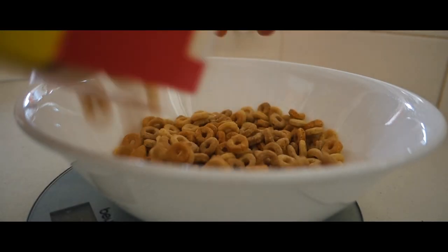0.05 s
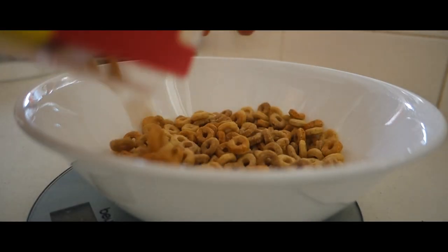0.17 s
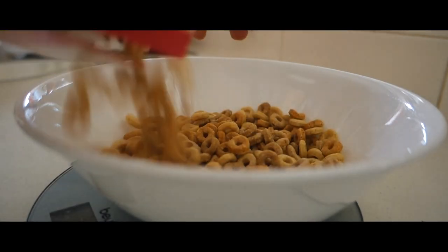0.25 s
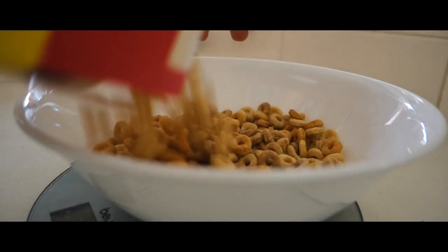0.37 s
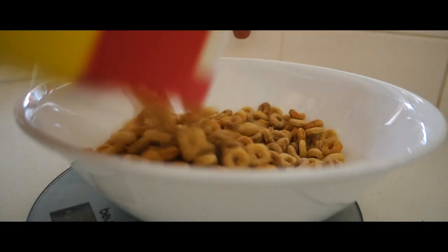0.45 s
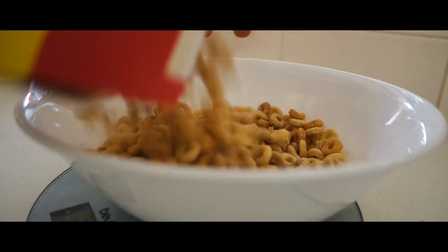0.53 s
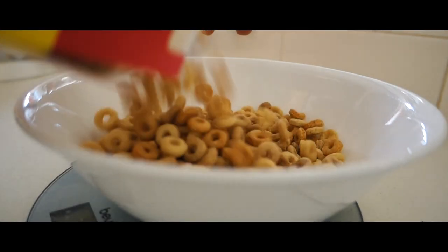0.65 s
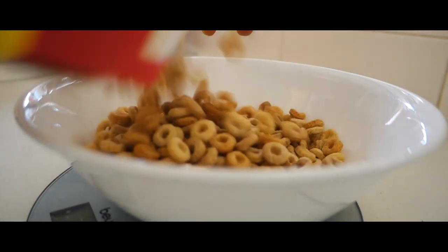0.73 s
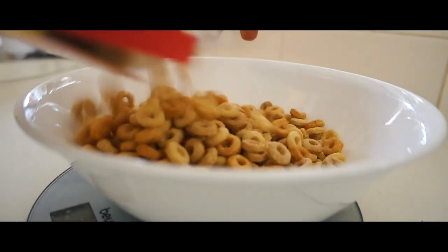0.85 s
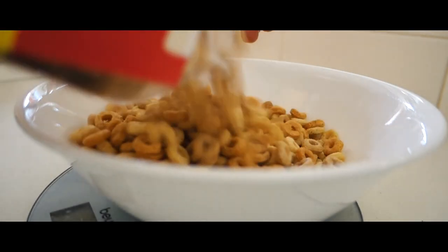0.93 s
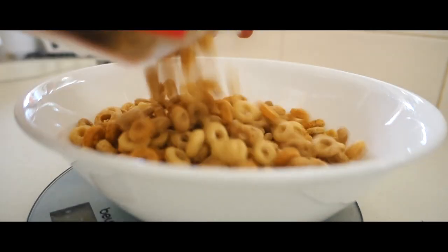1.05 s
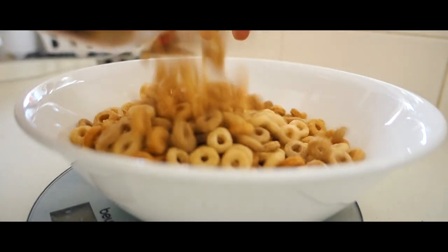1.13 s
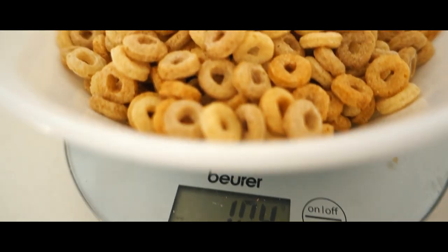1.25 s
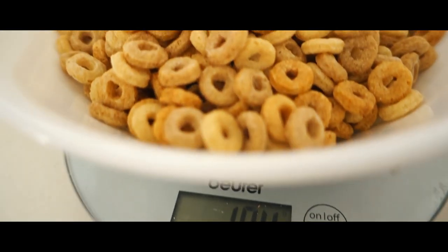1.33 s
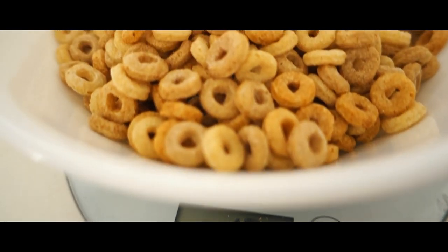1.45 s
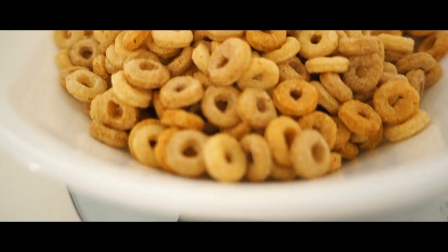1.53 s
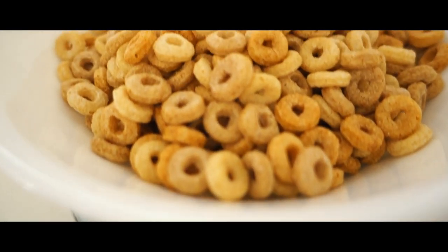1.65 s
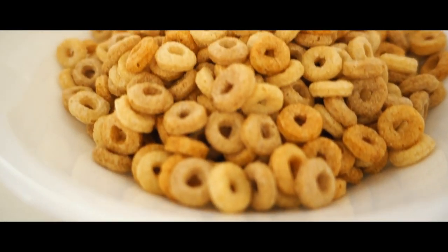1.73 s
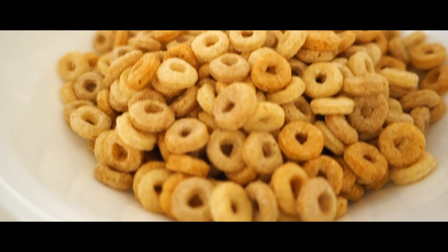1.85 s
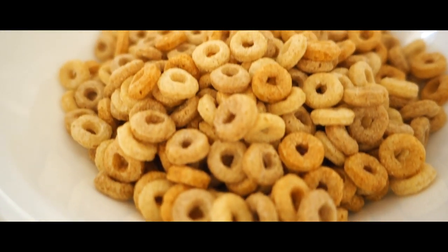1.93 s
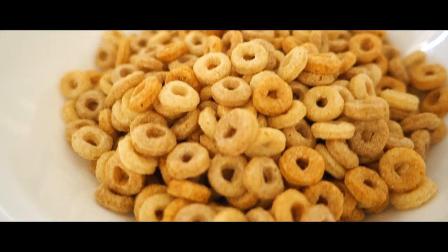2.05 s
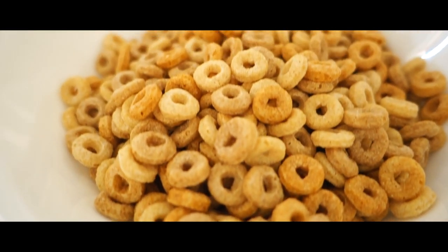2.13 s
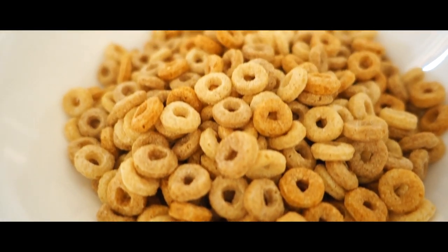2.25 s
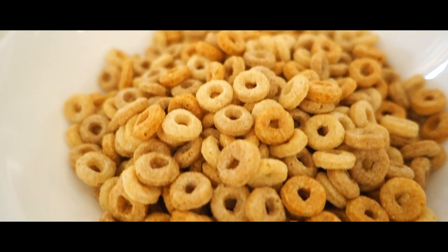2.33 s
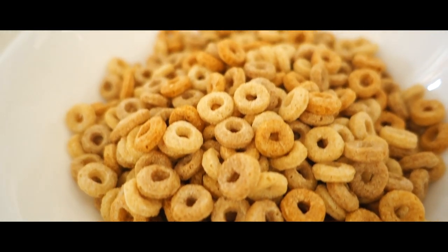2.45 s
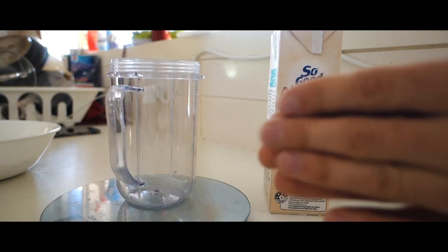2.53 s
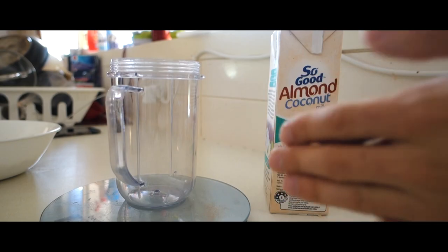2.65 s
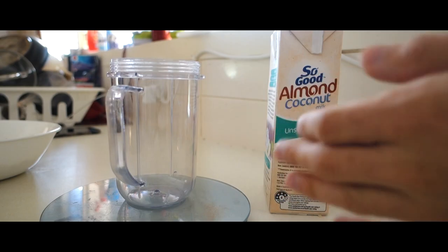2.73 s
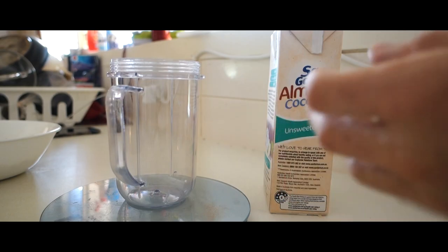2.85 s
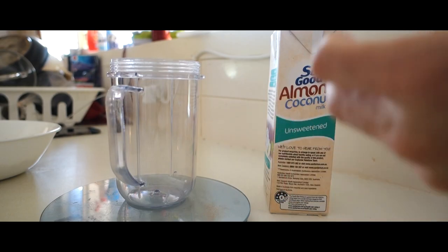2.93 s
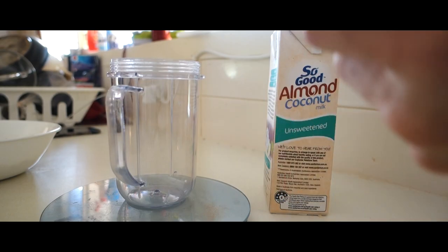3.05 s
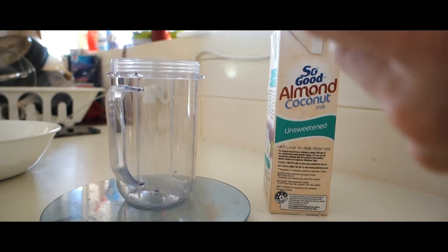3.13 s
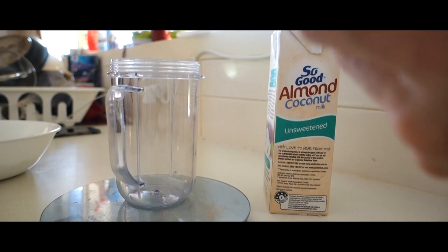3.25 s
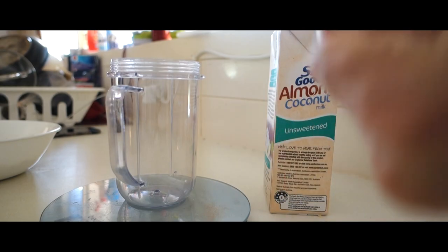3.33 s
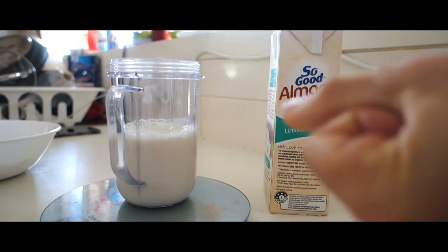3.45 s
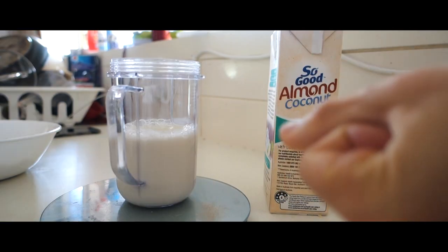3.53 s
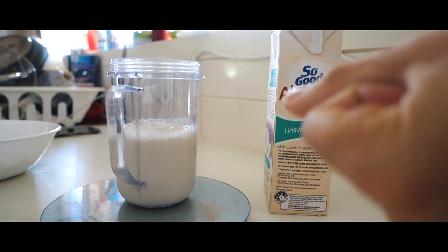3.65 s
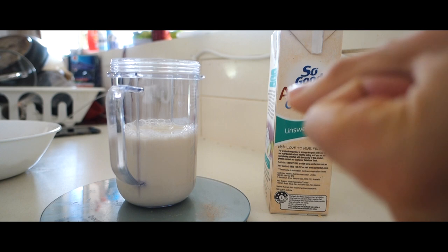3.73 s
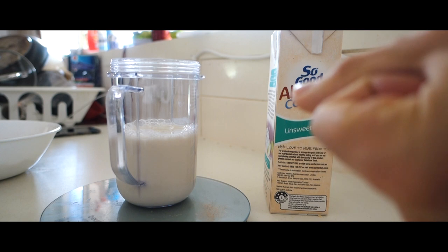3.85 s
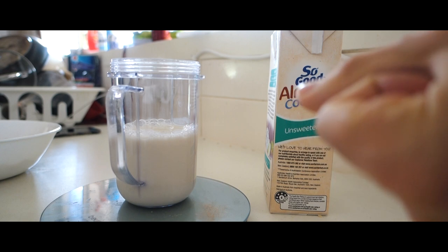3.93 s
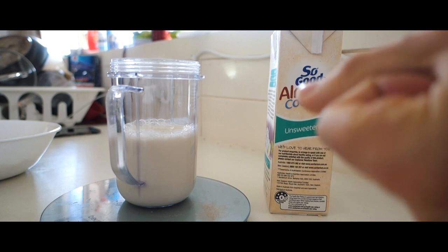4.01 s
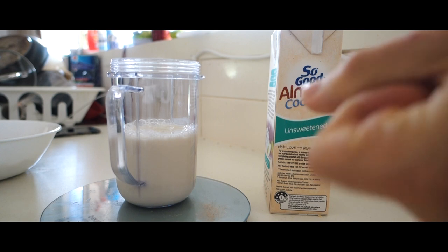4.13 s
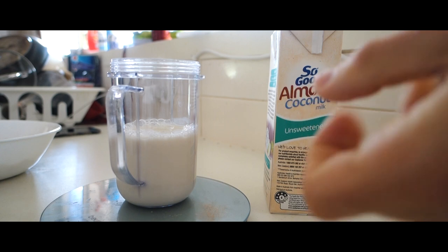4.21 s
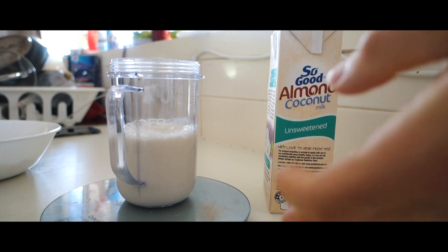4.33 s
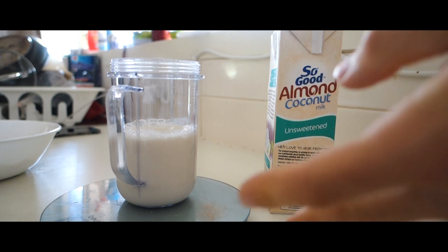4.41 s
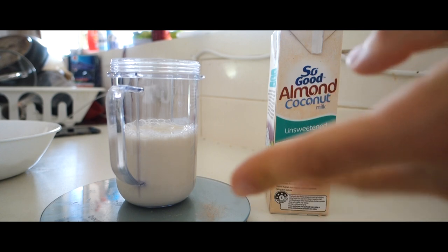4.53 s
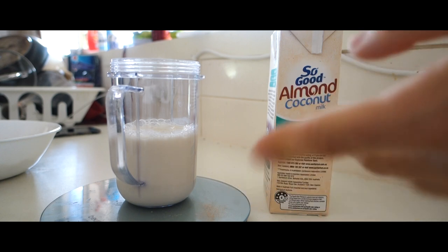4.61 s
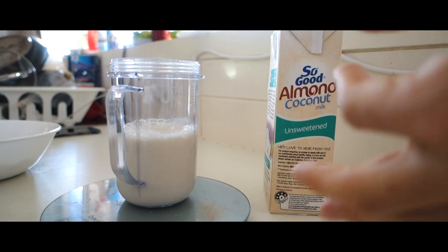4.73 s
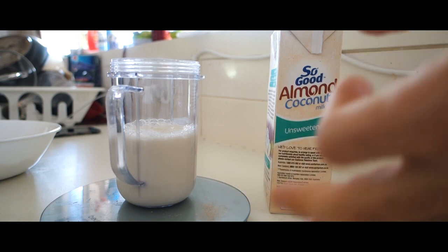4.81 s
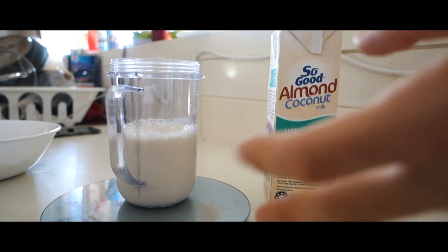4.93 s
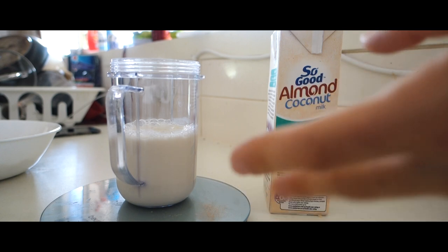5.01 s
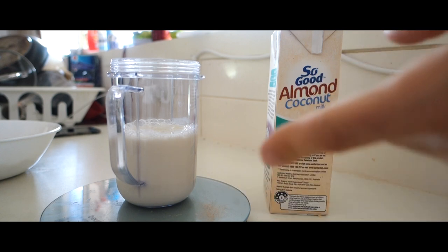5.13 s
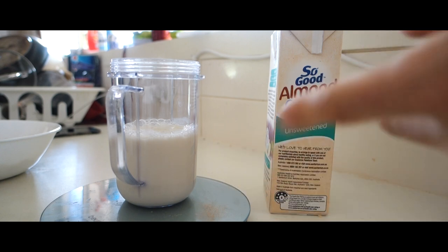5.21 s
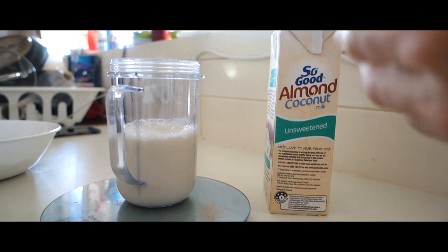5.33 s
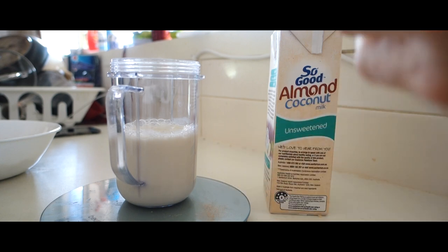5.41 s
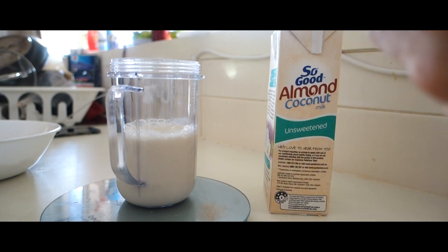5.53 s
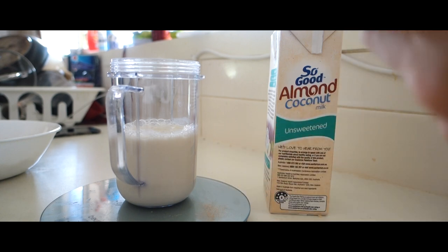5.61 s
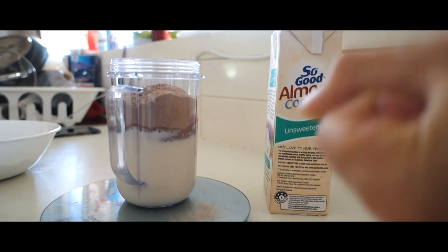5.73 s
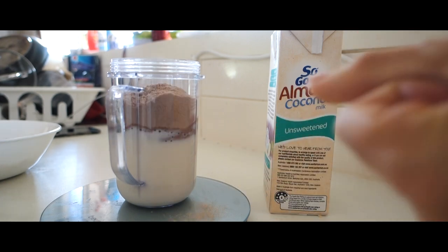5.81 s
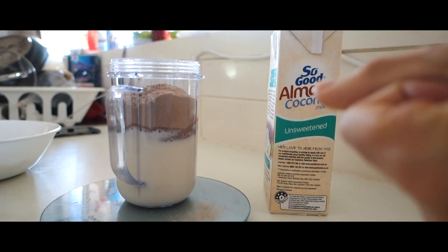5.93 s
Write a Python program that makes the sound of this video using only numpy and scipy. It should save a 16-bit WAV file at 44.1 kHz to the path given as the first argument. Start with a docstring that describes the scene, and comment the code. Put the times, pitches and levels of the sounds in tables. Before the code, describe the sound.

From 0 to 1.24 s, dry cereal hoops pour loudly and close in uneven shakes: hollow cardboard drumming and flaps, dense crisp clicks on the heap, and short high ceramic pings from the bowl. It stops dead. Low, quiet kitchen air remains, with small scratchy scuffs near 1.45 and 2.0 s and faint dull knocks between 1.4 and 2.4 s. At about 2.56 s the room tone switches abruptly, gaining a faint low appliance hum. A hand brushes with fine hiss and a tiny rising squeak at 2.7 s; woody counter knocks grow from 2.6 s into a tight flurry at 3.05-3.2 s, with one hard click. A sharp, bright finger snap cracks at 3.43 s, leaning right, with a hard-walled ring. Near quiet follows, with faint sleeve swishes around 4.6 s and 5.65 s. A second, slightly softer and lower snap comes at 5.77 s, its ring fading out.

```python
"""Cereal hoops are shaken from a cardboard box into a ceramic bowl, then hands scuff, knock and snap.
The pour is random collisions coloured as box and heap, plus decaying bowl modes; it stops dead.
Scuffs are jerky grains, knocks are bursts through counter resonances, the rustle is shaped hiss with a squeak.
Two finger snaps are noise cracks with a palm resonance, a thump and a long, hard-walled kitchen ring.
A low room tone lies underneath; it switches to a second colour with an appliance hum."""
import sys
import numpy as np
from scipy import signal
from scipy.fft import rfft, irfft, next_fast_len
from scipy.io import wavfile

SR = 44100
rng = np.random.default_rng(int(sys.argv[2]) if len(sys.argv) > 2 else 0)


def unload_wav(signal):
    """Save mono or channel-first audio to the path in sys.argv[1] as 16-bit WAV at rate SR, clipped to [-1, 1]."""
    wavfile.write(
        sys.argv[1],
        SR,
        np.round(np.clip(np.atleast_2d(signal).T, -1, 1) * 32767).astype(np.int16),
    )


N = 263091
T = np.arange(N) / SR
SIDES = np.array([[1], [-1]])  # left, right
TONE_SWITCH_S = 2.557  # the room tone changes here

# How hand sounds lean: (frequency [Hz], left minus right [dB])
HAND_LEAN = [(200, 0), (380, -1), (700, -2.5), (1290, -6.5), (2380, -9), (4400, -11), (8000, -9),
             (15000, -9.5)]


def undb(db):
    """Decibels to gain."""
    return 10 ** (np.asarray(db) / 20)


def unit(x):
    """Scale to rms 1."""
    return x / np.sqrt(np.mean(x ** 2))


def along(points, hz):
    """Read (Hz, value) points on a log-frequency axis."""
    f, value = np.transpose(points)
    return np.interp(np.log(hz), np.log(f), value)


def bins(x):
    """The frequency of each spectral bin of x, at least 1 Hz."""
    return np.maximum(np.fft.rfftfreq(x.shape[-1], 1 / SR), 1)


def shape(x, gain):
    """Minimum-phase filter whose gain is a function of frequency."""
    size = 2 * next_fast_len(x.shape[-1] // 2 + 2048)
    cepstrum = irfft(np.log(gain(bins(np.empty(size))) + 1e-6))
    # folding the cepstrum forward makes the filter causal
    cepstrum[..., 1:size // 2] *= 2
    cepstrum[..., size // 2 + 1:] = 0
    response = np.exp(rfft(cepstrum))
    return irfft(rfft(x, size) * response)[..., :x.shape[-1]]


def colour(x, points):
    """Filter by (Hz, dB) points."""
    return shape(x, lambda f: undb(along(points, f)))


def band(f, hz, width):
    """Gain of a steep-sided resonance."""
    return 1 / np.sqrt(1 + (2 * (f - hz) / width) ** 4)


def lean(x, points):
    """Tip a stereo sound to one side, band by band, keeping its power."""
    tilt = undb(SIDES * along(points, bins(x)) / 2)
    tilt = tilt / np.sqrt(np.mean(tilt ** 2, axis=0))
    return irfft(rfft(x) * tilt, x.shape[-1])


def ports(pair, width=None):
    """Two unrelated signals become left and right: a shared middle plus a side weighted by frequency."""
    # Default stereo width: (frequency [Hz], side minus mid [dB])
    near_width = [(100, -28), (250, -20), (700, -14), (1300, -10.5), (2400, -8), (4400, -3), (8000, -1.5),
                  (15000, -2)]
    width = near_width if width is None else width
    side = colour(pair[1], width)
    return shape(pair[0] + SIDES * side, lambda f: (1 + undb(2 * along(width, f))) ** -.5)


def noise(seconds):
    """White noise at the two ports."""
    return ports(rng.standard_normal((2, int(seconds * SR))))


def fade(t, t60):
    """Exponential decay by 60 dB in t60."""
    return np.exp(-np.log(1000) * t / t60)


def gesture(start, length, attack_s, release_s):
    """Envelope that swells up to a start time, holds, then dies away."""
    swell = (np.maximum(start - T, 0) / attack_s) ** 2
    release = np.maximum(T - start - length, 0) / release_s
    return np.exp(-swell - release)


def blow(x, db):
    """Scale a hit so that its energy, packed into 12 ms, has this level."""
    return undb(db) * x / np.sqrt(np.sum(x ** 2) / (.012 * SR))


def add(out, start, x):
    """Mix x in from a start time."""
    i = max(int(start * SR), 0)
    out[:, i:i + x.shape[-1]] += x[:, :max(N - i, 0)]


def follow(rows, column, n):
    """One column of a curve, sample by sample from its first row."""
    rows = np.asarray(rows)
    return np.interp(rows[0, 0] + T[:n], rows[:, 0], rows[:, column])


def kitchen(build_s, early=0):
    """Room response of unit energy: noise swells in over build_s, then each band decays at its own rate."""
    # Reverberation of the hard walls: (frequency [Hz], t60 [s])
    decay_times = [(100, 0.46), (500, 0.41), (2000, 0.62), (4300, 0.53), (8000, 0.46), (15000, 0.35)]
    hiss = noise(1.0)
    t, log_hz = T[:hiss.shape[1]], np.log(bins(hiss))
    centres = np.log([hz for hz, _ in decay_times])
    spectrum = rfft(hiss)
    tail = 0
    for share, (_, t60) in zip(np.eye(len(centres)), decay_times):
        weight = np.interp(log_hz, centres, share)  # overlapping triangular bands
        tail = tail + irfft(spectrum * weight, len(t)) * fade(t, t60)
    tail = tail * (1 - (1 - early) * np.exp(-(t / build_s) ** 2))
    return unit(tail) / np.sqrt(len(t))


def in_room(x, wet_db):
    """A sound plus its kitchen reverberation, by convolution."""
    echoes = signal.fftconvolve(x, kitchen(build_s=0.0034), axes=1)[:, :x.shape[1]]
    return x + undb(wet_db) * echoes


def grains(seconds, per_s, spread_db, cycles=2):
    """Tiny collisions at random times and sizes; each rings briefly with its own mix of pitches."""
    n = int(seconds * SR)
    hits = rng.random(n) < per_s / SR
    sizes = hits * undb(spread_db * np.minimum(rng.exponential(size=n), 2.9))
    ringing = np.zeros((2, n))
    for hz in np.geomspace(70, 14000, 16):
        b, a = signal.iirpeak(hz, max(cycles, 1), SR)
        ringing += signal.lfilter(b, a, sizes * rng.standard_normal((2, n)))
    return ports(ringing)


def room_tone(early_db, late_db):
    """Low kitchen air is coloured noise; after the switch an appliance hums in it with drifting phase."""
    # Air before and after the switch: (frequency [Hz], gain [dB])
    early_tone = [(15, -43.5), (25, -22), (111, 2.5), (145, -3), (175, -9), (659, -16.5), (754, -20.5),
                  (1070, -31.5), (1790, -22), (2910, -32), (3620, -27.5), (4740, -32.5), (16000, -34.5)]
    late_tone = [(15, -33), (25, -11), (49, -7), (117, -9), (149, -6), (405, -7.5), (439, -5), (476, -9.5),
                 (796, -20), (887, -25.5), (1230, -25), (1740, -28.5), (2840, -32), (4140, -35.5),
                 (16000, -37.5)]
    # Hum partials: (frequency [Hz], rms level [dB])
    hum_partials = [(146, -59), (444, -60), (1265, -80), (2902, -82)]
    # Stereo width of the air: (frequency [Hz], side minus mid [dB])
    air_width = [(60, -30.5), (110, -28), (200, -17.5), (380, -16), (700, -6), (1290, -0.5), (2380, 2.5),
                 (4400, 0), (8120, 1.5), (15000, -2.5)]

    def air(tone):
        return unit(colour(ports(rng.standard_normal((2, N)), air_width), tone))

    early, late = air(early_tone) * undb(early_db), air(late_tone) * undb(late_db)
    hum = np.zeros(N)
    for hz, db in hum_partials:
        drift = np.cumsum(rng.standard_normal(N)) * 0.0147  # radians
        hum += undb(db) * np.sqrt(2) * np.sin(2 * np.pi * hz * T + drift)
    return np.where(T < TONE_SWITCH_S, early, late + hum)


def bowl(n, patter_db):
    """Each hoop strikes a different spot, so it wakes its own mix of the bowl's decaying modes."""
    # Modes of the ceramic bowl: (frequency [Hz], relative level [dB], t60 [s])
    modes = [(3332, -10, .28), (4495, -2, .23), (5809, -7, .13), (7273, -5, .15), (7634, -3, .09),
             (7865, -6, .1), (8328, -9, .2), (8861, -7, .11), (9022, -7, .12), (9943, -12, .1),
             (11149, -10, .1), (12548, -12, .1), (12936, -13, .1), (14185, -13, .1)]
    # Hoops that hit the bare bowl: (time [s], low modes [relative dB], high modes [relative dB])
    pings = [(.064, -21, -25), (.102, -26, -24), (.188, -28, -27), (.338, -35, -22), (.354, -23.5, -25),
             (.488, -29, -29), (.710, -33, -24), (.787, -21, -27), (.872, -34, -24), (.925, -28, -24),
             (.949, -20, -23), (1.119, -21, -23), (1.233, -22, -23)]
    out = np.zeros((2, n))
    s, low_db, high_db = np.transpose(pings)
    for hz, db, t60 in modes:
        blows = (rng.random(n) < 100 / SR) * rng.standard_normal(n) * undb(patter_db)
        ping_levels = low_db if hz < 5000 else high_db
        blows[(s * SR).astype(int)] += undb(ping_levels + 1.5 * rng.standard_normal(len(s)))
        pole = np.exp(2j * np.pi * hz / SR) * fade(1 / SR, t60)
        ring = signal.lfilter([1], [1, -pole], blows)
        # opposite phase shifts left and right spread each mode
        out += undb(db) * np.imag(ring * np.exp(1j * SIDES * rng.uniform(-1.81, 1)))
    return out * undb(SIDES * -3.5)


def pour(box_db, heap_db, ping_db, wet_db):
    """Hoops drum in the box at each shake, click on the heap and ring the bowl; the whole sound breaks off
    abruptly at end_s."""
    # Cardboard box and heap of hoops: (frequency [Hz], gain [dB])
    box_colour = [(40, -9), (80, -11), (170, -5.5), (330, -3), (550, -1), (900, -4.5), (1400, -5.5),
                  (2200, -8), (3500, -15.5), (6000, -18.5), (15000, -49)]
    heap_colour = [(300, -23.5), (1000, -15), (2000, -2), (3800, 0.5), (5500, -1.5), (8000, 2), (11000, -2),
                   (16000, -5.5)]
    # Shakes that send the hoops tumbling: (time [s], length [s], relative level [dB])
    shakes = [(0.089, 0.047, -28), (0.245, 0.061, -25), (.385, 0.077, -24.5), (.525, 0.07, -19.5),
              (0.658, 0.15, -26.5), (0.798, 0.051, -19), (0.904, 0.024, -22), (0.961, 0.033, -20),
              (1.021, .075, -28)]
    # Stream landing on the heap: (time [s], relative level [dB], left minus right [dB])
    stream = [(0.0, -24, -3), (0.078, -28.5, -4), (0.176, -34, -6), (0.196, -26, -6.0),
              (0.276, -40.5, -6.5), (0.31, -29.5, -7), (0.356, -27, -7.5), (0.394, -32.5, -9),
              (0.472, -26, -4), (0.582, -30.5, -7), (0.588, -27, -7), (0.732, -28, -5.5),
              (0.858, -28.5, -4.0), (0.872, -25.5, -2.5), (1.002, -29.5, -6.5), (1.225, -29, -2.5)]
    # Clumps that strike the cardboard: (time [s], peak level [dB])
    clumps = [(.005, -9), (0.182, -3.5), (.189, -4.5), (0.304, -7), (0.59, -10.5), (0.819, -9.5),
              (.973, -11), (1.131, -7.5)]
    # How the tumbling leans: (frequency [Hz], left minus right [dB])
    pour_lean = [(200, 0), (400, 1), (1300, 2), (2400, .5), (4400, -4), (8000, -3)]
    end_s, attack_s, release_s = 1.238, 0.016, 0.02
    slide_db = -31  # between shakes the hoops slide on; relative to box_db
    n = int(end_s * SR)

    tumbling = unit(colour(grains(end_s + .1, per_s=1900, spread_db=3.5, cycles=2.5), box_colour))
    clicking = unit(colour(grains(end_s + .1, per_s=2600, spread_db=4.6, cycles=5), heap_colour))
    power = undb(slide_db) ** 2
    for s, length, db in shakes:
        power = power + (undb(db) * gesture(s, length, attack_s, release_s)) ** 2
    shaking = np.sqrt(power)
    landing = undb(follow(stream, 1, n) + heap_db)
    landing_sides = undb(SIDES * follow(stream, 2, n) / 2)
    out = np.zeros((2, N))
    out[:, :n] = lean(tumbling[:, :n], pour_lean) * shaking[:n] * undb(box_db)
    out[:, :n] += clicking[:, :n] * landing * landing_sides

    flap = colour(signal.unit_impulse(512),
                  [(150, -15.5), (700, -2.5), (1800, -2), (3500, -5.5), (8000, -26.0)])
    for s, db in clumps:
        add(out, s, np.ones((2, 1)) * undb(db) * flap / np.abs(flap).max())
    out = in_room(out, wet_db)
    out[:, :2 * SR] += undb(ping_db) * bowl(2 * SR, patter_db=-41)
    return out * fade(np.maximum(T - end_s, 0), 0.011)


def scuffs():
    """A grip slips in small jerks: a hollow rub with a dry scratch swelling above it."""
    # Handling scuffs: (time [s], length [s], rub level [dB], scratch level at the end of the swell [dB])
    slips = [(1.426, 0.1, -40, -42.5), (1.98, 0.031, -35, -43.5)]
    # Rub and scratch: (frequency [Hz], gain [dB])
    rub_colour = [(120, -31), (220, -3.5), (310, 8.5), (380, -1.5), (490, 3), (560, -15.5), (660, -39),
                  (1200, -47)]
    scratch_colour = [(380, -27), (650, -13), (1190, -4), (1290, -9), (2040, -8.5), (3680, -21.5),
                      (6470, -21), (7480, -26), (15000, -32.5)]
    attack_s, rub_release_s, scratch_release_s = 0.013, 0.047, 0.053
    swell_db_per_s = 106  # the scratch grows until the grip lets go
    tail_db, tail_s = -14, 0.24  # then it lingers faintly
    rub = unit(colour(grains(N / SR + .1, per_s=1200, spread_db=1.2), rub_colour))[:, :N]
    scratch = unit(colour(grains(N / SR + .1, per_s=4000, spread_db=-1.0), scratch_colour))[:, :N]
    out = np.zeros((2, N))
    for s, length, rub_db, scratch_db in slips:
        swell = undb(-swell_db_per_s * np.maximum(s + length - T, 0))
        tail = undb(tail_db) * gesture(s, length, 0.034, tail_s)
        grip = gesture(s, length, attack_s, scratch_release_s)
        out += rub * undb(rub_db) * gesture(s, length, attack_s, rub_release_s)
        out += scratch * undb(scratch_db) * swell * np.hypot(grip, tail)
    return out


def knocks(blow_t60, rattle_db, strike, click_t60, wet_db):
    """A blow and a loose rattle excite the counter: soft contact is duller, weight deeper and longer."""
    # Dull knocks: (time [s], level [dB], contact cut-off [Hz])
    hits = [(1.426, -40.5, 700), (1.528, -39.5, 1210), (1.759, -50, 2500), (1.902, -46.5, 442),
            (2.003, -36.5, 494), (2.415, -43.5, 670), (2.587, -29, 410), (2.768, -33.5, 350),
            (2.806, -24.5, 810), (2.936, -19, 805), (3.054, -28, 800), (3.079, -20, 900),
            (3.111, -20.5, 700), (3.127, -17.5, 1140), (3.140, -20, 750), (3.191, -19, 1020)]
    # Counter resonances: (frequency [Hz], width [Hz], relative level [dB])
    counter = [(86, 16, 5.5), (190, 49, -4), (365, 84, -0.5), (501.5, 58, -3.5), (734, 72, -2.5),
               (832, 83, -6.5), (1300, 250, -5), (1774, 180, -4.5), (3370, 3600, -12)]
    # Hard edges that click: (time [s], level [dB], frequency [Hz], width [Hz])
    clicks = [(2.937, -30, 3150, 2500), (3.045, -17.5, 1600, 770), (3.125, -35, 2300, 1400),
              (3.192, -36.5, 2280, 1400)]
    middling_db, middling_hz = -30, 700  # level and contact cut-off of a middling knock
    middling_t60, middling_low_hz = .14, 164  # its rattle decay [s] and lowest pitch
    deeper_db_per_octave, longer_db_per_doubling = 34, 32
    hard_thinning = 0.16  # octaves of bass lost per octave of contact hardness
    out = np.zeros((2, N))
    t = T[:SR // 4]
    for s, db, contact_hz in hits:
        weight_db = db - middling_db
        hardness = (contact_hz / middling_hz) ** hard_thinning
        low_hz = middling_low_hz * hardness * 2 ** (-weight_db / deeper_db_per_octave)
        t60 = middling_t60 * 2 ** (weight_db / longer_db_per_doubling)

        def body(f):
            modes = sum(undb(2 * mode_db) / (1 + (2 * (f - hz) / width) ** 2)
                        for hz, width, mode_db in counter)
            return np.sqrt(modes / (1 + (f / contact_hz) ** 5) / (1 + (low_hz / f) ** 4))

        push = noise(len(t) / SR) * (fade(t, blow_t60) + undb(rattle_db) * fade(t, t60))
        push[:, 0] += strike  # first contact
        add(out, s, blow(shape(push, body), db))
    for s, db, hz, width in clicks:
        click = shape(noise(len(t) / SR) * fade(t, click_t60), lambda f: band(f, hz, width))
        add(out, s, blow(click, db))
    return lean(in_room(out, wet_db), HAND_LEAN)


def rustle(hiss_db, squeak_width_hz):
    """Skin and sleeve brush past with fine hiss; a fingertip squeaks, rising in pitch as it speeds up."""
    # Strokes of a hand close by: (time [s], length [s], relative hiss level [dB])
    strokes = [(2.558, 0.022, -49.5), (2.704, 0.35, -49.5), (3.11, .075, -58), (3.335, 0.1, -53.5)]
    # Faint sleeve swishes: (time [s], peak level [dB], spread [s])
    swishes = [(4.596, -59, 0.041), (4.693, -65.5, 0.099), (5.65, -58.5, 0.094)]
    # Hand hiss and sleeve: (frequency [Hz], gain [dB])
    hiss_colour = [(300, 15.5), (800, 0.5), (1350, 9.5), (2200, 1), (3400, 4.5), (6000, -2), (9000, -2),
                   (13000, 3.5), (16000, 1)]
    sleeve_colour = [(600, -6), (1000, -7), (1280, 0.5), (1600, -17), (2400, -16), (3000, -15.5),
                     (4500, -33), (12000, -29)]
    attack_s, release_s = 0.03, 0.075
    squeak_at_s, squeak_s, squeak_db = 2.703, 0.038, -45
    squeak_hz, rise_hz, rise_s = 1214, 428, .06

    power = sum((undb(db + hiss_db) * gesture(s, length, attack_s, release_s)) ** 2
                for s, length, db in strokes)
    hiss = unit(colour(ports(rng.standard_normal((2, N))), hiss_colour))
    hiss = hiss * np.sqrt(power) * (T > TONE_SWITCH_S)

    # slow noise roughens the squeak's level
    wobble = shape(ports(rng.standard_normal((2, N))), lambda f: band(f, 0, squeak_width_hz))
    slip = unit(1.3 + unit(wobble))
    pitch = squeak_hz + rise_hz * np.clip((T - squeak_at_s) / rise_s, 0, 1) ** 2
    squeak = slip * np.sin(2 * np.pi * np.cumsum(pitch) / SR)
    squeak = squeak * undb(squeak_db) * gesture(squeak_at_s, squeak_s, 0.0094, 0.029)

    swell = sum(undb(db) * np.exp(-((T - s) / spread) ** 2 / 2) for s, db, spread in swishes)
    sleeve = unit(colour(ports(rng.standard_normal((2, N))), sleeve_colour))
    return lean(hiss + squeak, HAND_LEAN) + swell * sleeve


def snaps(cavity_db, crack_t60, thump_hz, lead_s, skin_db):
    """The finger thumps the palm and cracks the air out of the fist; the kitchen rings long after."""
    # Finger snaps: (time [s], crack peak [dB], palm cavity [Hz], cavity width [Hz],
    #   room level [dB], thump level [dB], top octave gain [dB])
    hits = [(3.4295, -8.5, 2180, 680, -32.5, -22.5, 1.5), (5.766, -11.5, 1806, 307, -35, -23, -1.5)]
    # Snap colour: (frequency [Hz], gain [dB])
    snap_colour = [(60, -7.5), (150, -6), (450, 2), (1000, -0.5), (1550, 3), (2700, -0.5), (3500, -0.5),
                   (4300, 5.5), (5300, -6.5), (6800, -6), (8700, -3.5), (11500, -9.5), (16000, -5)]
    # How the snaps lean: (frequency [Hz], left minus right [dB])
    snap_lean = [(400, 0), (700, -.5), (1300, -2.5), (2400, -4), (4400, -8.5), (8000, -9), (15000, -6.5)]
    out = np.zeros((2, N))
    t = T[:SR // 2]
    for s, crack_db, cavity_hz, width_hz, room_db, thump_db, top_db in hits:
        def fist(f):
            cavity = cavity_db * band(f, cavity_hz, width_hz) ** 2
            top = top_db / (1 + (7000 / f) ** 8)
            return undb(along(snap_colour, f) + cavity + top)

        crack = shape(noise(.5) * fade(t, crack_t60), fist)
        echoes = shape(kitchen(build_s=0.019, early=0.075), fist)
        thump = np.sin(2 * np.pi * thump_hz * t) + undb(skin_db) * noise(.5)
        add(out, s, undb(crack_db) * crack / np.abs(crack).max())
        add(out, s, undb(room_db) * unit(echoes))
        add(out, s - lead_s, undb(thump_db) * thump * fade(t, 0.02))
    return lean(out, snap_lean)


def scene():
    """Everything on the kitchen counter."""
    return (room_tone(early_db=-53.4, late_db=-51.5)
            + pour(box_db=-0.5, heap_db=1.5, ping_db=1.0, wet_db=-7)
            + scuffs()
            + knocks(blow_t60=0.019, rattle_db=3.5, strike=5.5, click_t60=0.018, wet_db=-9.5)
            + rustle(hiss_db=5, squeak_width_hz=180)
            + snaps(cavity_db=9.5, crack_t60=0.024, thump_hz=269.0, lead_s=0.0052, skin_db=-10))


def record(dry):
    """Soft saturation rounds the highest peaks, then a steep low-pass cuts the top."""
    ceiling, top_hz = .7, 16000
    rounded = ceiling * np.tanh(dry / ceiling)
    low_pass = signal.ellip(10, .2, 80, top_hz, fs=SR, output="sos")
    return signal.sosfilt(low_pass, rounded)


dry = scene()
out = record(dry)
unload_wav(out)
```